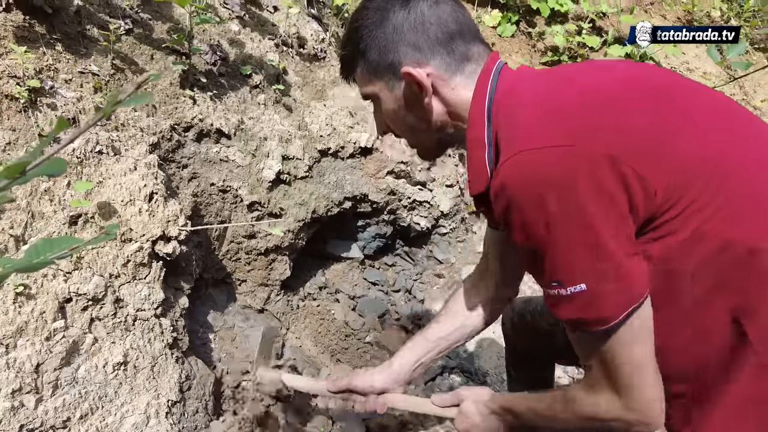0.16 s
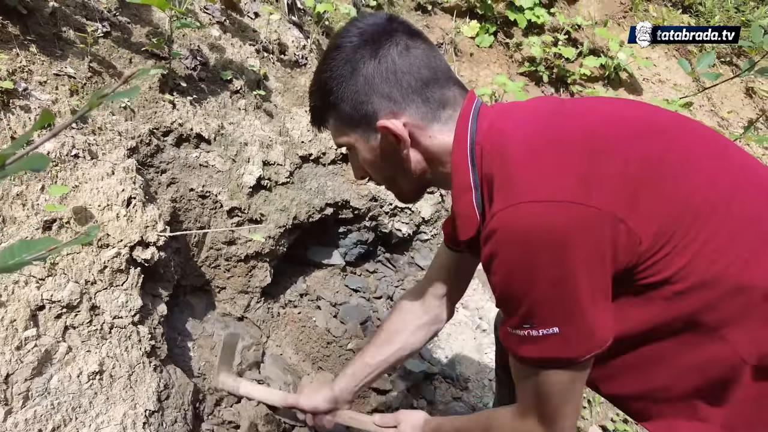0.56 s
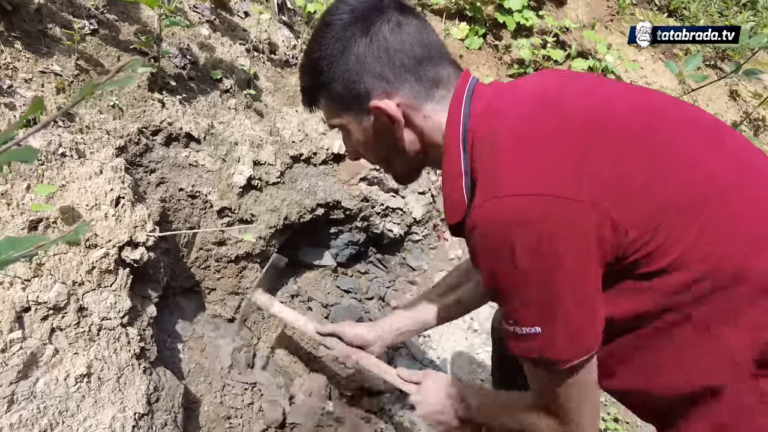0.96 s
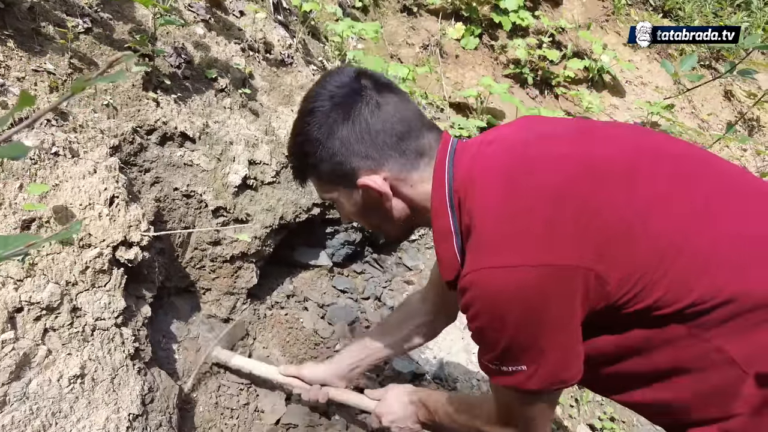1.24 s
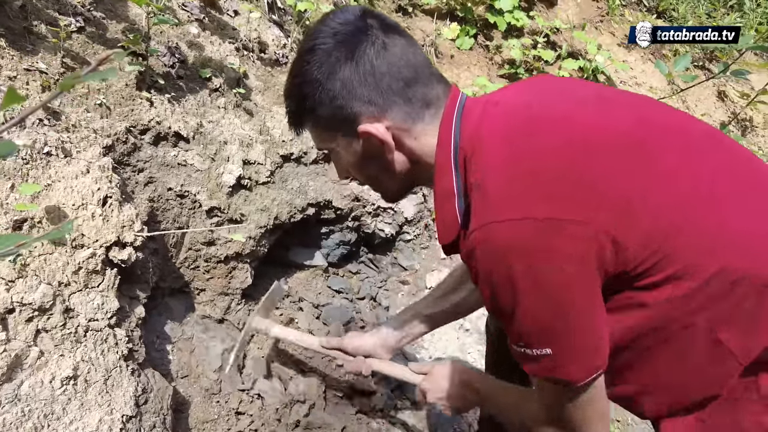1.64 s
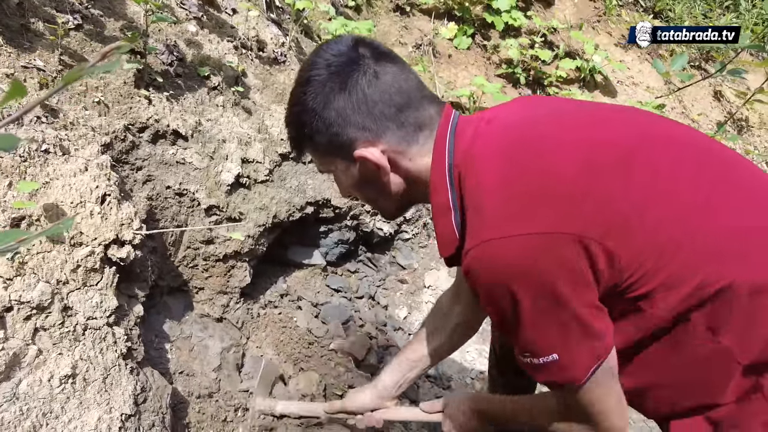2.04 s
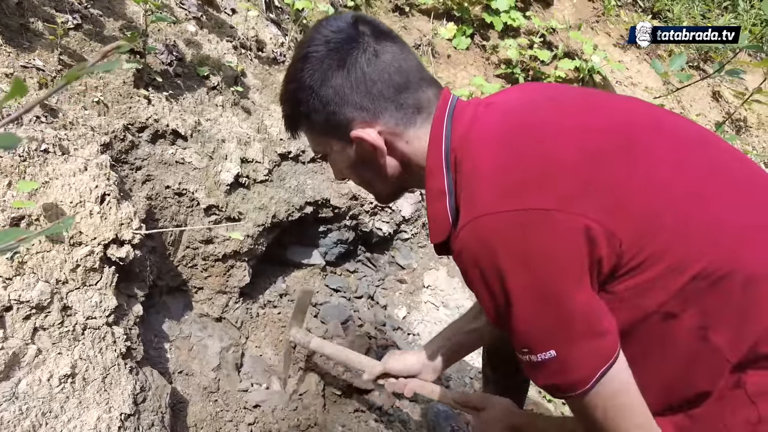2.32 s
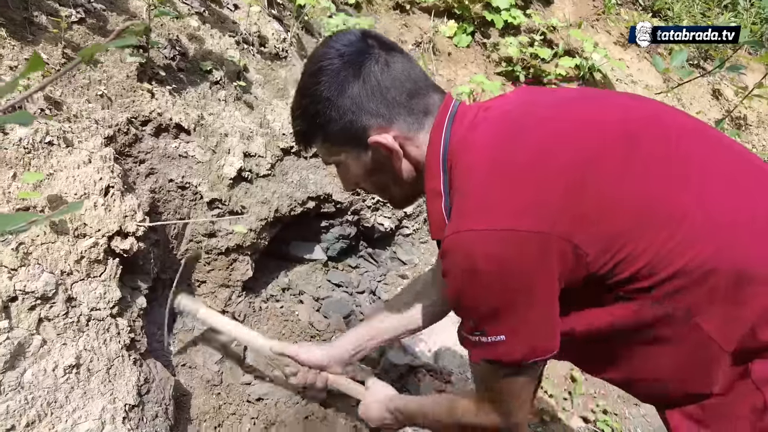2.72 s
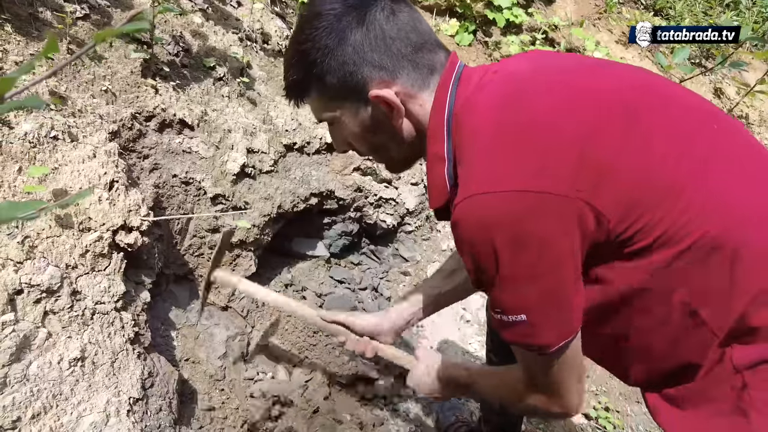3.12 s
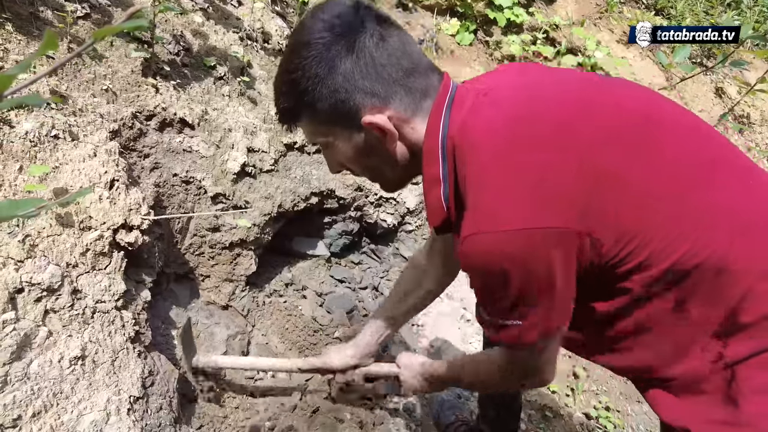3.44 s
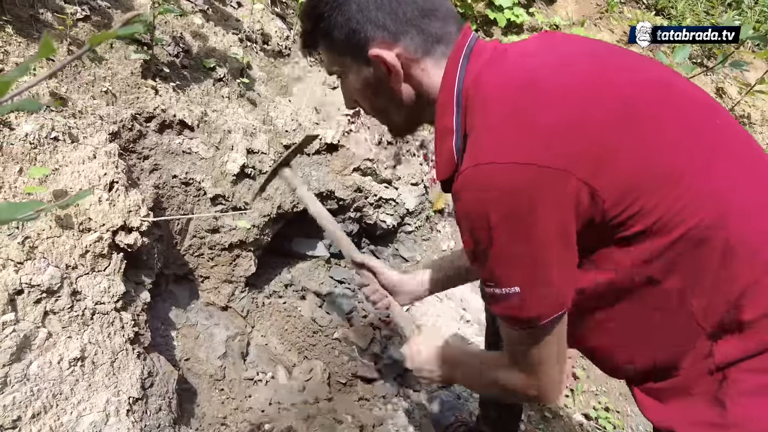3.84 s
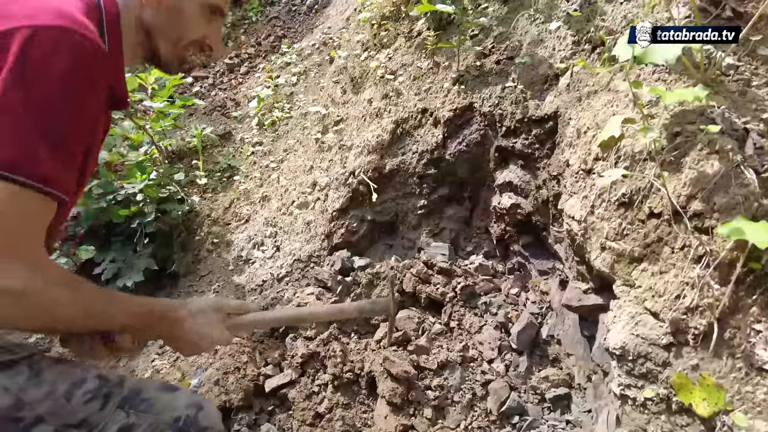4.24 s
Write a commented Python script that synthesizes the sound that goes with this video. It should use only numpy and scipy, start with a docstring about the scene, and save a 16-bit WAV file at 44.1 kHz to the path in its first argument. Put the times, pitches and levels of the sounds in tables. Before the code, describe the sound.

A small steel pick knocks into crumbly rock outdoors, with gritty scraping, clattering stone flakes and light wind.

```python
"""Quick blows and a gritty scrape: a small, wooden-handled steel pick digs into a shale bank outdoors.
Each impact crushes rock for a few milliseconds and excites the damped modes of the pick; friction
drags the blade through grit, and loose flakes clatter. Light wind rumbles over a faint hiss.
All sound drops out briefly before a last, quieter raking of rubble."""
import sys
import numpy as np
from scipy import signal
from scipy.fft import rfft, irfft, next_fast_len
from scipy.io import wavfile
from scipy.ndimage import uniform_filter1d

SR = 44100
rng = np.random.default_rng(int(sys.argv[2]) if len(sys.argv) > 2 else 0)


def generate_wav(signal):
    """Clip the signal to [-1, 1] and save it as 16-bit WAV at the path in sys.argv[1]."""
    frames = np.transpose(np.atleast_2d(signal))
    scaled = np.clip(frames, -1, 1) * 32767
    pcm = np.round(scaled).astype(np.int16)
    wavfile.write(sys.argv[1], SR, pcm)


N = 192672
TIME = np.arange(N) / SR

# background level, stepping down midway and partly back up near the end: time_s, level_db
BACKGROUND_CURVE = [(0, -49), (1.675, -47), (1.69, -57.5), (2.6, -57.5), (3.95, -57), (4.0, -51.5),
                    (4.37, -51.5)]
# low gusts of air, most of them around a swing of the pick: peak_s, level_db
WIND_GUSTS = [(0.09, -39.5), (0.63, -35), (0.87, -40), (1.19, -61), (1.36, -41), (1.97, -38.5), (2.23, -47),
              (2.88, -43.5), (3.44, -34.5), (4.07, -44)]
# spectral envelopes of wind, rustle, hiss, grinding and sand: frequency_hz, density_db
WIND_SPECTRUM = [(18, -3), (33, 3.5), (55, -5), (85, -4), (130, -17.5), (220, -19)]
RUSTLE_SPECTRUM = [(70, -23), (130, -9), (200, 4.5), (290, -2.5), (420, -16), (700, -51)]
HISS_SPECTRUM = [(300, 0), (900, -2), (1700, 0), (3500, -7), (7000, -10.5), (11000, -15), (12200, -14.5),
                 (13400, -4), (15500, -5.5)]
DRAG_SPECTRUM = [(150, 3.5), (400, -5.5), (600, 2.5), (800, -2), (1050, -14.5), (1350, -4.5), (1620, -3),
                 (2000, -12.5), (2800, -23)]
SAND_SPECTRUM = [(1200, -14.5), (1900, -9), (3000, 2.5), (4200, 1), (5200, -4.5), (6200, -4), (7500, -9.5),
                 (10000, -10.5), (15500, -12.5)]
# grit and sand trickling down the face, relative to the background: time_s, level_db
TRICKLE_CURVE = [(0, -7), (0.3, -5), (0.55, 3), (0.8, 2), (1.25, -14), (2.15, 0), (2.4, -18.5), (3.8, -7),
                 (4.37, -13)]
# loose stones knocking: start_s, level_db, pitch_hz, edge_db, contact_s
STONE_IMPACTS = [(0.037, -45, 2510, -23, 0.0039), (0.226, -44, 550, -15, 0.0038),
                 (0.305, -34, 1380, -42, 0.00088), (0.398, -45.5, 4140, 22, 0.0028),
                 (0.468, -40.5, 745, -13, 0.0082), (0.548, -34, 555, -25, 0.0031),
                 (0.652, -27.5, 635, -13, 0.0025), (0.67, -22.5, 580, -31, 0.014),
                 (0.692, -28.5, 1620, -16, 0.0011), (0.7475, -39, 3140, -10, 0.0013),
                 (0.792, -38.5, 426, -7, 0.0026), (0.8415, -36, 8900, 12, 0.0016),
                 (0.849, -30, 437, -36, 0.0009), (0.853, -32, 566, -22, 0.001),
                 (0.996, -35, 4370, -7, 0.0053), (1.005, -36.5, 2800, 3, 0.0027),
                 (1.358, -31.5, 1390, -12, 0.00082), (1.428, -33, 4250, -6, 0.0035),
                 (1.5025, -36.5, 3100, -4.5, 0.0015), (1.559, -38.5, 556, -5, 0.0073),
                 (1.607, -32, 1710, -6.5, 0.0017), (1.811, -36, 3160, -6.5, 0.0022),
                 (1.835, -34.5, 777, -14.5, 0.0051), (1.966, -35.5, 1530, -20, 0.003),
                 (2.951, -40, 2900, -19, 0.0029), (2.972, -31.5, 820, -23, 0.022),
                 (3.278, -39, 1580, -25, 0.011), (3.548, -37, 830, -9, 0.0054),
                 (3.622, -25.5, 750, -19, 0.0057), (3.627, -28.5, 373, -30, 0.0014),
                 (3.726, -44.5, 505, -11, 0.0058), (4.057, -42.5, 796, -22, 0.0026),
                 (4.121, -45, 1310, -7, 0.0016), (4.145, -47, 720, -13, 0.012),
                 (4.222, -48, 412, -25, 0.015)]
# earth yielding under heavy blows: start_s, level_db, first_hz, settled_hz, t60_s
EARTH_THUMPS = [(0.6, -18.5, 427, 45.8, 0.071), (0.66, -28.5, 55, 43.6, .25),
                (1.321, -25, 185, 150.5, 0.14), (1.943, -28, 260, 150.2, 0.27),
                (2.863, -26.5, 218, 128.5, 0.082), (3.442, -27, 61, 32, 0.55)]
# strokes of the blade through grit, loudest as the rock gives: peak_s, rise_s, fall_s, pressure_db, sand_db
BLADE_STROKES = [(0.0, 0.02, 0.01, -33, -52), (0.069, 0.04, 0.11, -33.5, -42.5),
                 (0.158, 0.087, 0.057, -30.5, -35), (0.682, 0.045, 0.033, -21.5, -25.5),
                 (1.02, 0.061, 0.45, -50, -40.5), (1.344, 0.061, 0.24, -35.5, -36),
                 (1.434, 0.04, 0.06, -34, -38), (1.655, 0.1, 0.049, -52, -45),
                 (1.964, 0.039, 0.027, -32.5, -34.5), (2.057, 0.11, 0.026, -37, -41.5),
                 (2.2, 0.098, 0.25, -61.5, -59.5), (2.551, 0.16, 0.11, -66, -52),
                 (2.65, 0.059, 0.2, -58.5, -76), (2.954, 0.12, 0.096, -39, -42),
                 (3.01, 0.053, 0.012, -35.5, -37.5), (3.546, 0.042, 0.056, -48, -47.5),
                 (3.635, 0.06, 0.069, -39, -47), (4.151, 0.05, 0.018, -50.5, -55.5),
                 (4.238, 0.034, 0.043, -42, -65), (4.354, 0.059, 0.021, -45.5, -48)]
# modes of the whole pick, handle low and steel head high: pitch_hz, bandwidth_hz, level_db
PICK_MODES = [(574, 40, 0.5), (823, 79, 9.5), (1323, 143, 2), (1640, 270, 7.5), (2000, 250, -4.5),
              (2607, 33, 11.5), (3010, 520, 3), (3225, 68, 15.5), (4120, 56, 8), (4620, 89, 13.5),
              (5970, 200, 1), (6600, 240, -7), (7650, 86, -3.5), (8810, 90, 8), (9700, 90, 8)]
# free vibration of the steel head: pitch_hz, bandwidth_hz, level_db
HEAD_MODES = [(2920, 33, -22), (4100, 60, -17.5), (4650, 130, 6), (4470, 50, 3), (5100, 50, -15),
              (6000, 50, -15), (9030, 70, -8)]
# the head levered in a tight crack: start_s, length_s, level_db, favoured_hz
LEVER_PULLS = [(1.947, 0.12, -49.5, 4850), (3.441, 0.13, -63, 5750)]
# blows of the pick: start_s, thud_db, knock_db, crack_db, chip_db, crush_s, crumble_share, slab_hz, ring_db
PICK_BLOWS = [(0.068, -33.5, -31.5, -42, -50, 0.017, 0.22, 1660, -63),
              (0.144, -32, -29, -33, -38.5, 0.015, 0.054, 760, -58),
              (0.591, -29, -28.5, -37.5, -49, 0.0068, 0.053, 748, -67),
              (1.3171, -41, -23, -25.5, -37.5, 0.007, 0.58, 540, -30.5),
              (1.399, -64, -39, -28.5, -39.5, 0.0045, 0.076, 4100, -55),
              (1.9378, -30, -22.5, -19, -25, 0.0038, 0.23, 1410, -35),
              (2.028, -46, -43, -35, -43, 0.0028, 0.12, 4370, -45),
              (2.859, -32.5, -20, -18, -21, 0.0032, 0.077, 4960, -56),
              (3.4265, -36, -31, -32.5, -39.5, 0.0045, 0.039, 6040, -51.5),
              (3.6108, -35, -26.5, -30.5, -46, 0.0045, 0.1, 830, -55)]


def from_db(db):
    """Decibels to amplitude ratio."""
    return 10 ** (np.asarray(db) / 20)


def unit_rms(x):
    """Normalise power to rms 1."""
    return x / np.sqrt(np.mean(x ** 2) + 1e-20)


def unit_burst(x):
    """Normalise energy to that of ten milliseconds at rms 1."""
    return x / np.sqrt(np.sum(x ** 2) / (SR / 100) + 1e-20)


def curve_db(rows):
    """Linear interpolation of a level curve at every sample."""
    return np.interp(TIME, *np.transpose(rows))


def swell(peak_s, rise_s, fall_s):
    """Exponential growth and decay, in dB: up 20 dB in rise_s, down 20 dB in fall_s."""
    return -20 * np.maximum((peak_s - TIME) / rise_s, (TIME - peak_s) / fall_s)


def power_sum(levels_db):
    """Incoherent sounds add in power; their joint level in dB."""
    return 10 * np.log10(sum(10 ** (np.maximum(db, -150) / 10) for db in levels_db))


def add(out, start_s, x):
    """Superpose a short sound at start_s."""
    at = max(0, round(start_s * SR))
    out[..., at:at + x.shape[-1]] += x[..., :N - at]


def band(x, hz, kind="band", order=2):
    """Butterworth filtering."""
    sos = signal.butter(order, np.clip(hz, 10, .45 * SR), kind, fs=SR, output="sos")
    return signal.sosfilt(sos, x + 1e-18)


def resonance(x, hz, width_hz):
    """Forced response of one damped mode, gain 1 at its peak."""
    radius = np.exp(-np.pi * width_hz / SR)
    angle = 2 * np.pi * min(hz, 18000) / SR
    gain = (1 - radius ** 2) / 2
    return signal.lfilter([gain, 0, -gain], [1, -2 * radius * np.cos(angle), radius ** 2], x + 1e-18)


def coloured(x, spectrum):
    """Spectral shaping by an envelope that rolls off beyond its ends; rms 1."""
    hz, db = np.transpose(spectrum)
    size = next_fast_len(N)
    log_hz = np.log(np.fft.rfftfreq(size, 1 / SR) + 1)
    beyond = abs(log_hz - np.clip(log_hz, np.log(hz[0]), np.log(hz[-1])))
    gain = from_db(np.interp(log_hz, np.log(hz), db) - 24 * beyond)
    return unit_rms(irfft(rfft(x, size) * gain, size)[..., :N])


def fractures(per_s, spread_db, size):
    """A Poisson process of tiny breaks, of random sign and uneven strength."""
    strength = from_db(spread_db * np.minimum(rng.exponential(1, size), 3.5))
    return (rng.random(size) < per_s / SR) * strength * rng.choice([-1, 1], size)


def wide(pair, side_db):
    """Two uncorrelated signals, as middle and side, give stereo width."""
    return pair[0] + from_db(side_db) * pair[1] * np.array([[1], [-1]])


def noise(level_db, spectrum, side_db):
    """Gaussian stereo noise, amplitude-modulated by a level curve."""
    return from_db(level_db) * unit_rms(wide(coloured(rng.standard_normal((2, N)), spectrum), side_db))


def surroundings():
    """Three noise bands superpose: gusting wind, earth settling after each stroke, and hiss."""
    background_db = curve_db(BACKGROUND_CURVE)
    gusts_db = [db + swell(peak_s, rise_s=0.062, fall_s=0.19) for peak_s, db in WIND_GUSTS]
    settling_db = [pressure_db - 22.5 + swell(peak_s, rise_s=0.04, fall_s=0.57)
                   for peak_s, _, _, pressure_db, _ in BLADE_STROKES]
    wind = noise(power_sum([background_db + 2] + gusts_db), WIND_SPECTRUM, side_db=-18.5)
    rustle = noise(power_sum([background_db - 3.5] + settling_db), RUSTLE_SPECTRUM, side_db=-12.5)
    return wind + rustle + noise(background_db, HISS_SPECTRUM, side_db=-2.5)


def bank_echo(x, echo_db=-12.0, t60_s=0.056, dull_hz=5500):
    """Diffuse reflection in the bank's rough hollow gives a short, dull echo, different on each side."""
    t = TIME[:SR // 5]
    scatter = rng.standard_normal((2, len(t))) * from_db(-60 * t / t60_s) * (t > .003)
    scatter = band(scatter, dull_hz, "low", order=1)
    scatter /= np.sqrt(np.sum(scatter ** 2, axis=1, keepdims=True))
    return x + from_db(echo_db) * signal.fftconvolve(x, scatter, axes=1)[:, :N]


def from_left(x, lag_samples=1.714, shadow_db=0.5, shadow_hz=3000, scatter_db=-5.5):
    """Path difference and shadowing: sound from slightly left reaches the right later and duller."""
    size = next_fast_len(N)
    hz = np.fft.rfftfreq(size, 1 / SR)
    tilt = from_db(shadow_db / 2 * hz ** 2 / (hz ** 2 + shadow_hz ** 2))
    paths = np.array([tilt, np.exp(-2j * np.pi * hz * lag_samples / SR) / tilt])
    # the shortest waves also glance off nearby stones, differently for each side
    glances = rfft(rng.standard_normal((2, 96)) / np.sqrt(96), size)
    paths += from_db(scatter_db) * glances * hz ** 4 / (hz ** 4 + 10000 ** 4)
    return irfft(rfft(x, size) * paths, size)[:, :N]


def crumbs(pressure_db, per_s=50, level_db=-4.0, damping=0.13):
    """Small clods roll off as the blade works, each a heavily damped resonator with a dull pitch."""
    pitches = np.geomspace(450, 3400, num=14)
    clods = sum(resonance(fractures(per_s / len(pitches), 1.8, N), hz, hz * damping) / hz ** 0.17
                for hz in pitches)
    stirred_db = uniform_filter1d(np.minimum(pressure_db, -44), size=1500)
    return from_db(stirred_db + level_db) * unit_rms(band(clods, 4900, "low"))


def soil(fall_s=0.057):
    """Earth loosened by each blow slumps in many soft impacts, heard as low shot noise."""
    out, t = np.zeros(N), TIME[:SR // 4]
    for start_s, _, knock_db, _, _, _, crumble_share, *_ in PICK_BLOWS:
        clods = fractures(1300, 1.8, len(t)) * t * np.exp(-2 * t / fall_s)
        add(out, start_s, crumble_share * from_db(knock_db) * unit_burst(band(clods, [110, 340])))
    return out


def spray(fall_s=0.015, level_db=-9.5):
    """Fine chips fly off each blow and pepper the rock, heard as high shot noise."""
    out, t = np.zeros(N), TIME[:SR // 8]
    for start_s, _, _, _, chip_db, *_ in PICK_BLOWS:
        chips = fractures(6000, 1.5, len(t)) * t * np.exp(-2 * t / fall_s)
        add(out, start_s, from_db(chip_db + level_db) * unit_burst(band(chips, [4500, 9500])))
    return out


def stones(damping=0.11, bed_db=4.5, rattle_s=0.0085, rattle_share=0.011):
    """Impact on a rough face excites a flake's plate modes, which decay in a few cycles."""
    out, t = np.zeros(N), TIME[:SR // 12]
    for start_s, db, hz, edge_db, contact_s in STONE_IMPACTS:
        landing = t / contact_s * np.exp(-2 * t / contact_s)
        force = fractures(6000, 1.26, len(t)) * (landing + rattle_share * np.exp(-t / rattle_s))
        ring = sum(from_db(mode_db) * unit_burst(resonance(force, hz * ratio, hz * ratio * damping))
                   for ratio, mode_db in [(1, 7), (1.62, -23), (2.4, -19)])
        bed = unit_burst(band(pick(force, direct_db=-3.0), [340, 4200]))   # the rubble and blade it hits
        body = band(ring + from_db(bed_db) * bed, 1800 + 1.07 * hz, "low", order=3)   # big flakes: soft
        edge = unit_burst(band(band(force, 4000, "high"), 8300, "low", order=1))
        add(out, start_s, from_db(db) * unit_burst(unit_burst(body) + from_db(edge_db) * edge))
    return out


def thumps(rise_s=0.00091, settle_s=0.0049):
    """Heavy blows set the soft bank in damped oscillation, sinking in pitch as the earth yields."""
    out, t = np.zeros(N), TIME[:SR // 3]
    for start_s, db, first_hz, settled_hz, t60_s in EARTH_THUMPS:
        hz = settled_hz + (first_hz - settled_hz) * np.exp(-t / settle_s)
        envelope = from_db(db - 60 * t / t60_s) * (1 - np.exp(-t / rise_s))
        add(out, start_s, envelope * np.sin(2 * np.pi * np.cumsum(hz) / SR))
    return out


def effort():
    """Levels of grinding and of sliding sand in dB: each stroke adds its power to a trickle that rises and
    falls over time."""
    trickle_db = curve_db(BACKGROUND_CURVE) + curve_db(TRICKLE_CURVE)
    pressure, sand = [trickle_db - 3.6], [trickle_db - 4.35]
    for peak_s, rise_s, fall_s, pressure_db, sand_db in BLADE_STROKES:
        shape_db = swell(peak_s, rise_s, fall_s)
        pressure.append(pressure_db + shape_db)
        sand.append(sand_db + shape_db)
    return power_sum(pressure), power_sum(sand)


def grains(level_db, base_per_s):
    """Two trains of shot noise, scaled for even power: a harder push breaks more grains each second."""
    rate = from_db(0.2 * (level_db + 45))
    return np.array([fractures(base_per_s * rate, 5.05, N) for _ in range(2)]) / np.sqrt(rate)


def drag(pressure_db, sand_db):
    """Friction over coarse grit drives the pick's modes, while fine sand slides off the face."""
    shaken = pick(grains(pressure_db, base_per_s=2400), direct_db=20.5)
    grinding = wide(coloured(shaken, DRAG_SPECTRUM), side_db=-10.5)
    sliding = wide(coloured(grains(sand_db, base_per_s=4500), SAND_SPECTRUM), side_db=-2.5)
    return from_db(pressure_db) * grinding + from_db(sand_db) * sliding


def singing(release_s=0.008, focus_octaves=0.17):
    """Stick-slip of the wedged tip sustains the head's modes, above all those near one pitch."""
    out, t = np.zeros(N), TIME[:SR // 4]
    for start_s, length_s, db, favoured_hz in LEVER_PULLS:
        slips = fractures(3000, 1.5, len(t)) * np.exp(-np.maximum(t - length_s, 0) / release_s)
        ring = np.zeros(len(t))
        for hz, width_hz, mode_db in HEAD_MODES:
            coupling = np.exp(-(np.log2(hz / favoured_hz) / focus_octaves) ** 2)
            ring += from_db(mode_db) * coupling * resonance(slips, hz, width_hz)
        add(out, start_s, from_db(db) * unit_rms(ring) * np.sqrt(length_s / t[-1]))
    return out


def pick(force, direct_db, min_width_hz=100):
    """Modal superposition: the bare contact plus modes of alternating sign, damped by hands and rock."""
    modes = [from_db(db) * resonance(force, hz, max(width_hz, min_width_hz))
             for hz, width_hz, db in PICK_MODES]
    return from_db(direct_db) * force + sum(modes[::2]) - sum(modes[1::2])


def blows(rise_s=0.00098, crumble_s=0.013, slab_damping=0.12, chatter_s=0.033):
    """Brittle fracture under the tip: a dense volley of breaks, then crumbling, rings pick and slab."""
    out, t = np.zeros(N), TIME[:SR // 4]
    registers_hz = [(110, 420), (420, 2000), (2000, 7000), (7000, 17000)]
    for start_s, *levels_db, crush_s, crumble_share, slab_hz, ring_db in PICK_BLOWS:
        crush = unit_rms(fractures(10000, 3.8, len(t))) * np.exp(-(t / crush_s) ** 1.76)
        debris = unit_rms(fractures(1300, 3.0, len(t))) * np.exp(-t / crumble_s)
        force = (crush + crumble_share * from_db(-4.5) * debris) * (1 - np.exp(-t / rise_s))
        slab = from_db(11.5) * resonance(force, slab_hz, slab_hz * slab_damping)
        splinters = from_db(-24.0) * band(force, 9700, "high")
        impact = pick(force, direct_db=-4.0) + slab + splinters
        # how deep the tip bites decides the balance of thud, knock, crack and chip
        for edges_hz, db in zip(registers_hz, levels_db):
            add(out, start_s, from_db(db) * unit_burst(band(impact, edges_hz, order=3)))
        # the steel clinks on unevenly while it chatters against the rock
        chatter = fractures(640, 7.6, len(t)) * np.exp(-t / chatter_s)
        clink = sum(from_db(db) * unit_burst(resonance(chatter, hz, width_hz))
                    for hz, width_hz, db in HEAD_MODES)
        add(out, start_s, from_db(ring_db) * unit_burst(clink))
    return out


def scene():
    """Superposition of tool and debris, their echo from the bank, thumps and surroundings."""
    pressure_db, sand_db = effort()
    tool = from_db(1.4) * blows() + singing() + from_db(-2.0) * drag(pressure_db, sand_db)
    debris = spray() + soil() + from_db(-1.0) * stones() + crumbs(pressure_db)
    return from_left(bank_echo(tool + debris)) + thumps() + surroundings()


def record(dry):
    """Gating silences the sound for a moment; a steep low-pass removes the highest treble."""
    silent_from_s, silent_to_s, cutoff_hz = 3.937, 4.0, 15900
    gate = uniform_filter1d(1.0 * ((TIME < silent_from_s) | (TIME > silent_to_s)), size=64)
    return signal.sosfilt(signal.ellip(10, .2, 70, cutoff_hz, fs=SR, output="sos"), dry * gate)


dry = scene()
out = record(dry)
generate_wav(out)
```